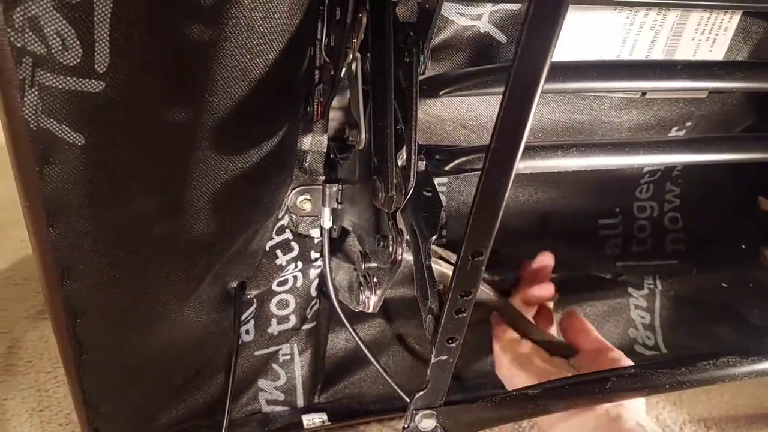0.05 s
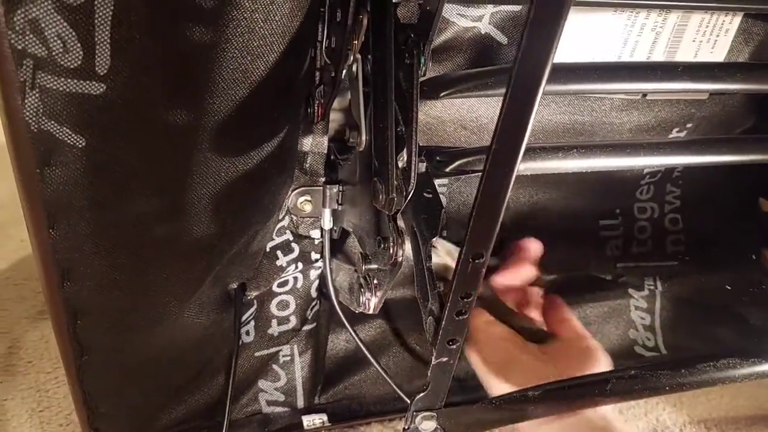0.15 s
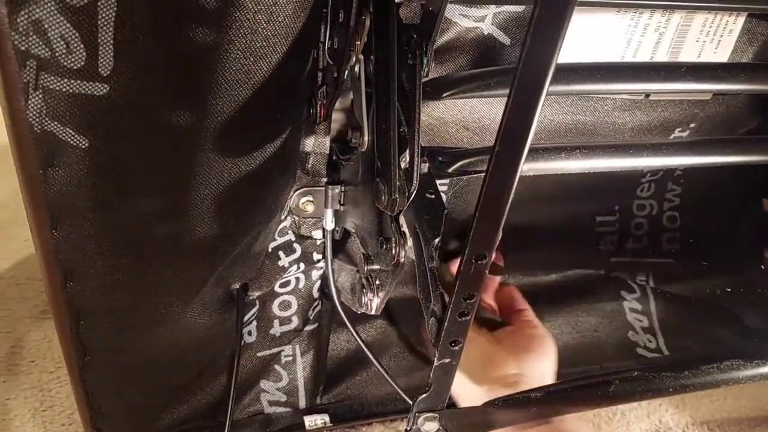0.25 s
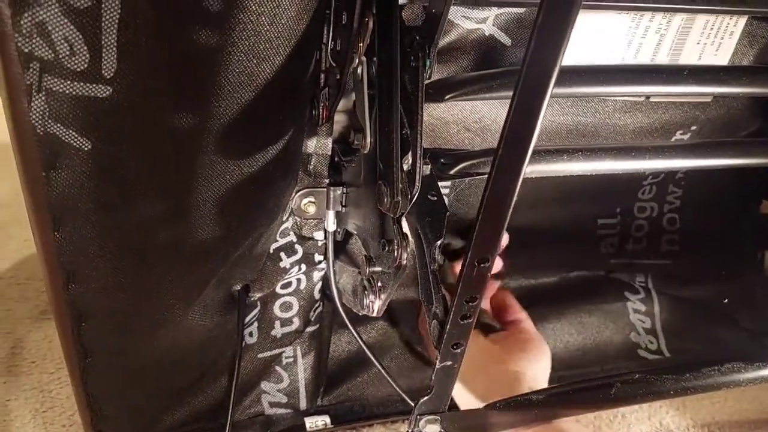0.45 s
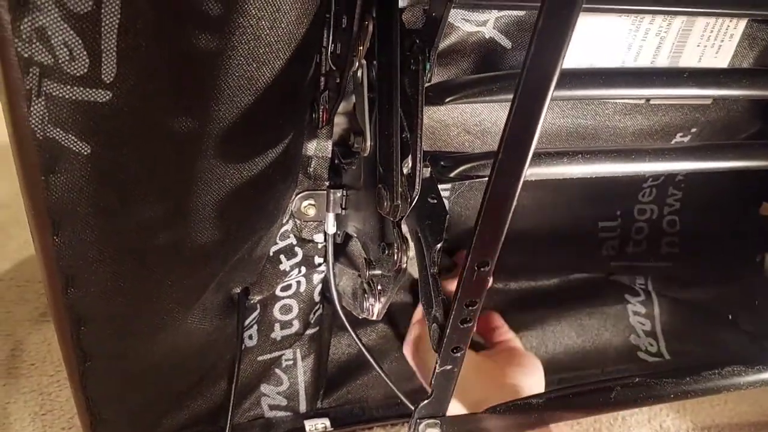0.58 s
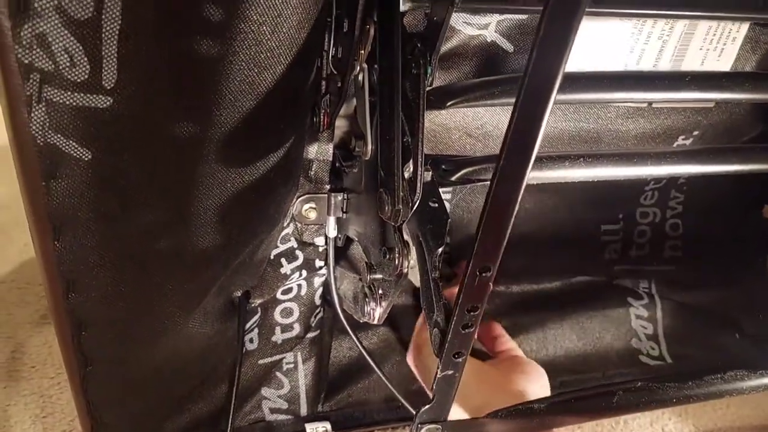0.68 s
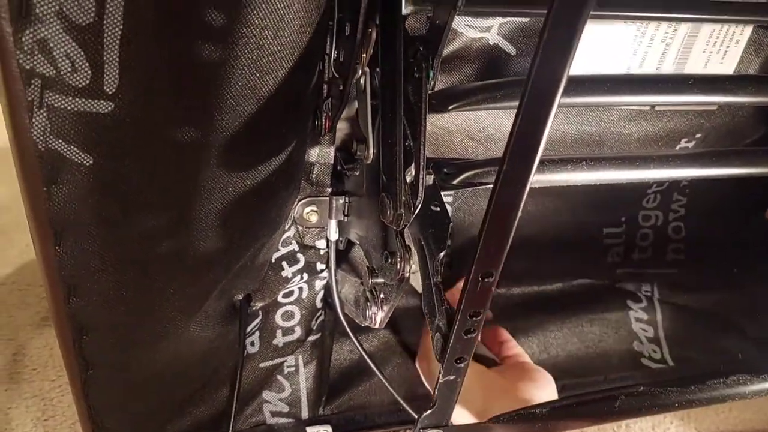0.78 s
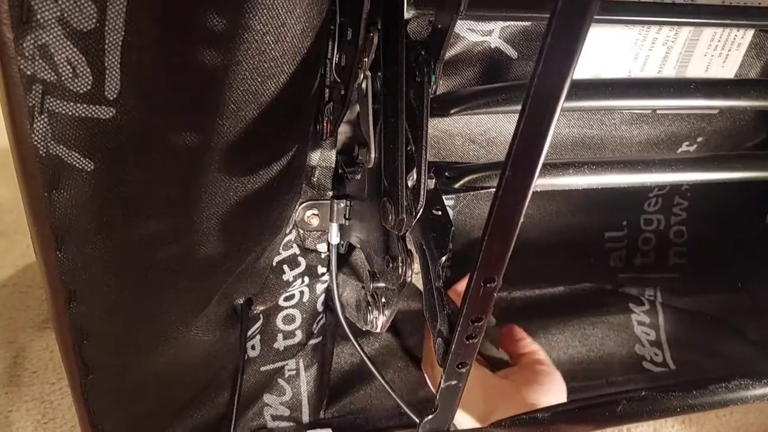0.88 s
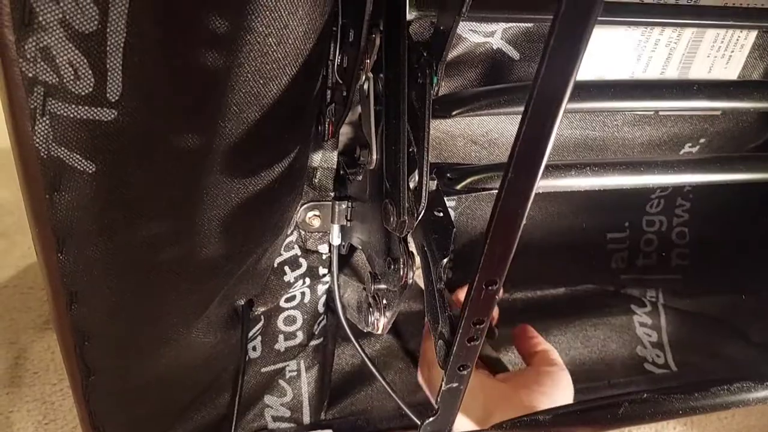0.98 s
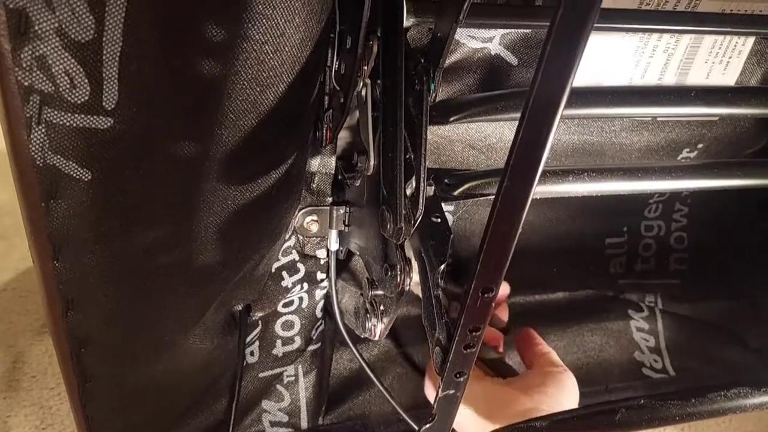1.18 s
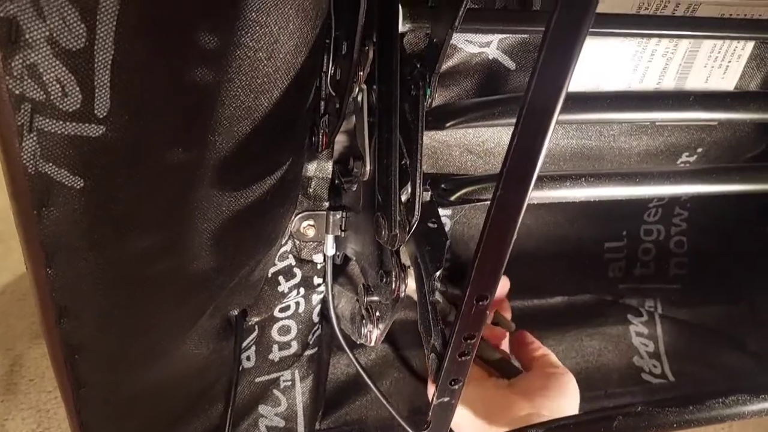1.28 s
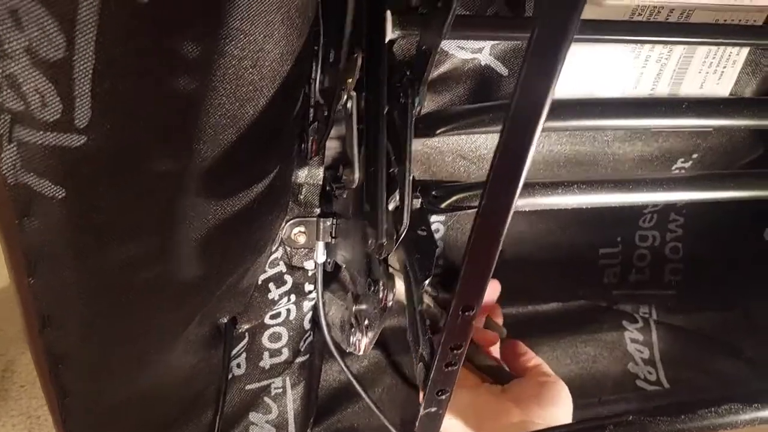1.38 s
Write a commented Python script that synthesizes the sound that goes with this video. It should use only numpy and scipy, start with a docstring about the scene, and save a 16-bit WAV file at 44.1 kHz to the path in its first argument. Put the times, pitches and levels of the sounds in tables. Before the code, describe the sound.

A loose metal part clacks against a recliner's steel linkage: one sharp knock, a double clack, a faint tick, then a softer knock. The chair frame thuds dully and cloth rubs quietly between them, close by in a room.

```python
"""In a carpeted room, a hand works a loose metal part into the steel linkage under a tipped-up recliner.
Each contact is an impact that excites two bodies: the steel gives a bright clack and rings, and the
upholstered frame bolted to it gives a dull thud. The heavy chair sways with a low boom, and the room
adds a short reverberation. Between contacts, arm and cloth slide softly over the chair's lining."""
import sys
import numpy as np
from scipy import signal
from scipy.fft import rfft, irfft
from scipy.io import wavfile

SR = 44100
rng = np.random.default_rng(int(sys.argv[2]) if len(sys.argv) > 2 else 0)


def to_wav(sig):
    """Store sig (one row per channel, or 1-D mono) as 16-bit WAV at the path in sys.argv[1].

    Samples outside -1..1 are clipped; the rate is SR.
    """
    pcm = np.clip(np.atleast_2d(sig), -1, 1) * 32767
    pcm = np.round(pcm).astype(np.int16)
    wavfile.write(sys.argv[1], SR, pcm.T)  # frames by channels


N = 63945
TIME = np.arange(N) / SR
ATTACK_S = 0.00039  # rise time of steel on steel

# Impacts of the part on the linkage: start_s, clack_db, tick_db, ring_db, knock_db, thump_db, rattle_s,
# favoured_hz, boost_db, decay_factor (small when the hand damps the steel), sway_db
CONTACTS = [(.225, -23.5, -23, -29, -17.5, -21.5, 0.0037, 4600, 7.7, 1.135, -29),
            (.553, -34.5, -31.5, -52, -58, -33.5, 0.0016, 4300, 2.9, 0.85, -47),
            (0.578, -25, -25, -33, -28.5, -29, 0.0037, 3350, 6.2, 0.69, -35),
            (.9485, -51.5, -29, -60.5, -55, -40, 0.0009, 3300, 17, 0.47, -65),
            (1.1702, -34.5, -33, -43.5, -34.5, -36, 0.0031, 1350, 15.4, 1.25, -40.5)]


def from_db(db):
    """Amplitude grows tenfold for every 20 dB."""
    return 10 ** (np.asarray(db) / 20)


def place(x, pan_db, lag_s=0):
    """Direction is heard from differences in level (pan_db, left minus right) and time (left lags)."""
    left, right = x * np.ones((2, 1))
    return np.array([np.interp(TIME - lag_s, TIME, left) * from_db(pan_db / 2),
                     right * from_db(-pan_db / 2)])


def noise(spectrum, coherence):
    """Spectral shaping of stereo noise to unit rms; coherence is the correlation of the channels."""
    hz, db = np.transpose(spectrum)
    bins_hz = np.fft.rfftfreq(N, 1 / SR)
    gain = from_db(np.interp(np.log(bins_hz + 1), np.log(hz), db))
    gain *= np.minimum(bins_hz / hz[0], 1) ** 2
    mid, side = irfft(rfft(rng.standard_normal((2, N))) * gain, N)
    x = np.sqrt(1 + coherence) * mid + np.sqrt(1 - coherence) * np.array([side, -side])
    return x / x.std()


def burst(start_s, attack_s, hold_s, t60_s):
    """Damping: an envelope rises linearly and, from hold_s on, falls 60 dB in each t60_s."""
    age = TIME - start_s
    return np.clip(age / attack_s, 0, 1) * np.exp(-np.log(1000) * np.maximum(age - hold_s, 0) / t60_s)


def ring(start_s, hz, t60_s, push_s):
    """A damped oscillator builds up while it is pushed, then decays freely."""
    return burst(start_s, push_s, push_s, t60_s) * np.sin(2 * np.pi * hz * (TIME - start_s))


def sliding_cloth(grain_db=1.5, grain_s=0.009):
    """Sliding friction makes broadband noise: a grainy rub and hiss over the handled chair's rumble."""
    # Course of the sliding: time_s, rub_db, hiss_db, rumble_db
    slide = [(0, -56.5, -64.5, -63.5), (.06, -57, -61, -67), (.135, -54.5, -48.5, -73.5),
             (.165, -54, -54.5, -64), (0.199, -55, -40.5, -54), (.3, -50.5, -50, -40.5),
             (.42, -60, -57, -52.5), (.54, -64, -56, -58), (.68, -63, -68, -53.5), (.75, -59, -63, -59.5),
             (.8, -57.5, -61, -57), (0.913, -56, -67, -51), (0.951, -48.5, -48, -58.5),
             (1.01, -56, -67.5, -57), (1.12, -61.5, -65.5, -64.5), (1.221, -54.5, -59, -47),
             (1.279, -67.5, -82.5, -53.5), (1.37, -77.5, -71.5, -61.5), (1.45, -63, -60.5, -65.5)]
    # Spectra of the three noises: frequency_hz, density_db
    rub_spectrum = [(300, 7.5), (500, -1.5), (800, 0), (1300, -4), (2200, 4.5), (2800, 0.5), (3350, -6.5),
                    (4300, 0), (5500, -3.5), (6900, -1), (8500, -17.5), (12000, -29), (16000, -4)]
    hiss_spectrum = [(4500, -5), (9000, -11), (11000, -1.5), (12500, 6.5), (14500, 1.5), (16000, 3)]
    rumble_spectrum = [(20, -28), (45, 2), (65, 2), (115, 9.5), (180, -4), (250, -4), (370, 0), (550, -10),
                       (900, -53.5), (2000, -46)]
    times_s, *levels_db = np.transpose(slide)
    rub_gain, hiss_gain, rumble_gain = [from_db(np.interp(TIME, times_s, db)) for db in levels_db]
    fibres = np.interp(TIME / grain_s, np.arange(N), rng.standard_normal(N))
    rub = place(rub_gain * noise(rub_spectrum, coherence=0.04), pan_db=3)
    hiss = place(hiss_gain * noise(hiss_spectrum, coherence=0.035), pan_db=-5.5)
    rumble = place(rumble_gain * noise(rumble_spectrum, coherence=0.87), pan_db=4.5)
    return (rub + hiss) * from_db(grain_db * fibres) + rumble


def rub_resonances(fade_s=0.025):
    """Resonance picks hollow bands out of the friction noise while each stroke lasts."""
    # Rubbed resonances: start_s, end_s, centre_hz, width_hz, level_db, pan_db
    resonances = [(0, 0.223, 1940, 200, -64.5, 4), (0.056, 0.263, 536, 260, -55.5, -1.5),
                  (0.077, 0.187, 11360, 700, -62.5, -18), (0, 0.437, 12600, 400, -76.5, -13),
                  (0.242, 0.505, 4980, 500, -62, 0), (0.26, 0.502, 6570, 550, -61, 4.5),
                  (0.737, 1.18, 1940, 283, -69, 5), (0.74, 1.174, 2770, 232, -77, -20),
                  (0.753, 1.173, 4070, 378, -69, 3), (0.77, 1.187, 4710, 324.1, -69.5, 4),
                  (1.163, 1.262, 5830, 300, -67, 14)]
    out = np.zeros((2, N))
    for start_s, end_s, hz, width_hz, db, pan_db in resonances:
        bandpass = signal.butter(2, [hz - width_hz / 2, hz + width_hz / 2], "band", fs=SR, output="sos")
        band = signal.sosfilt(bandpass, rng.standard_normal((2, N)))
        stroke = np.clip(np.minimum(TIME - start_s, end_s - TIME) / fade_s, 0, 1)
        out += place(from_db(db) * stroke * band / band.std(), pan_db)
    return out


def favoured_db(hz, centre_hz, boost_db, width_octaves=0.22):
    """The point of impact sets which modes are excited best: a bell-shaped boost in frequency."""
    return boost_db * np.exp(-0.5 * (np.log2(hz / centre_hz) / width_octaves) ** 2)


def impact(start_s, rattle_s, t60_s, bite_db=-10):
    """An impact's envelope holds while the part rattles, then decays; a sharp bite marks its onset."""
    bite = from_db(bite_db) * burst(start_s + 0.0012, ATTACK_S, ATTACK_S, t60_s=0.0074)
    return burst(start_s, ATTACK_S, rattle_s, t60_s) + bite


def steel_linkage(scatter_db=3.5, clack_t60_s=0.037, tick_t60_s=0.04, coherence=0.18, lag_s=0.00042):
    """Impact excitation: the steel's crowded modes merge into a noisy clack; the strongest ring on."""
    # Light touches of the steel: start_s, level_db
    touches = [(0.272, -36), (.602, -69), (1.149, -55.5), (1.327, -68), (1.338, -69), (1.427, -67)]
    # Modes of the links: pitch_hz, level_db, t60_s, pan_db
    link_modes = [(746.4, -10.5, 0.27, 5), (1114, -12.5, 0.18, 9.5), (1410, -6.5, .13, 6),
                  (1690, -3.5, 0.08, -3), (1839, -3, 0.069, 10.5), (2055, -10.5, 0.056, 13),
                  (2327, -6.5, 0.072, 9.5), (2393, 2, 0.083, 11), (2725, 2.5, 0.031, 1.5),
                  (3395, -7, 0.11, -5.5), (3726, -8, .06, -9), (3680, -2.5, .07, -9.5),
                  (4826, -9, 0.048, 6.5), (5050, -20, 0.02, 14.5), (5825, -1, 0.042, 18),
                  (7710, -3.5, 0.024, 9)]
    # Spectra of the clack and of its high tick: frequency_hz, density_db
    clack_spectrum = [(200, 5), (500, -1.5), (900, -11), (1400, -11.5), (2200, 3.5), (3000, -3),
                      (4300, -1.5), (6000, 1), (7700, -1.5), (8700, -11.5), (11000, -8), (16000, -11)]
    tick_spectrum = [(6000, -14), (8700, -10.5), (9800, -14.5), (11200, 1.5), (12500, 5), (13400, 6.5),
                     (15000, -7.5), (16000, -3)]
    # The loose part's own mode: pitch_hz, level_db (relative to the tick), t60_s
    part_mode = (11000, -8.5, 0.058)
    part_hz, part_db, part_t60_s = part_mode
    clack_hz, density_db = np.transpose(clack_spectrum)
    grid_hz = np.geomspace(clack_hz[0], SR / 2, 200)
    grid_db = np.interp(np.log(grid_hz), np.log(clack_hz), density_db)
    touching = sum(from_db(db) * burst(start_s, ATTACK_S, ATTACK_S, clack_t60_s)
                   for start_s, db in touches)
    clack = touching * noise(clack_spectrum, coherence)
    treble = noise(tick_spectrum, coherence)
    tick, modes = np.zeros((2, N)), np.zeros((len(link_modes), N))
    for start_s, clack_db, tick_db, ring_db, _, _, rattle_s, centre_hz, boost_db, decay, _ in CONTACTS:
        spectrum = np.transpose([grid_hz, grid_db + favoured_db(grid_hz, centre_hz, boost_db)])
        clack += from_db(clack_db) * impact(start_s, rattle_s, clack_t60_s) * noise(spectrum, coherence)
        part_ring = from_db(part_db) * ring(start_s, part_hz, part_t60_s * decay, ATTACK_S)
        tick += from_db(tick_db) * (impact(start_s, rattle_s, tick_t60_s * decay) * treble + part_ring)
        for k, (hz, db, t60_s, _) in enumerate(link_modes):
            strength_db = ring_db + db + favoured_db(hz, centre_hz, boost_db) + scatter_db * rng.normal()
            modes[k] += from_db(strength_db) * ring(start_s, hz, t60_s * decay, ATTACK_S)
    rings = sum(place(mode, pan_db, lag_s) for mode, (*_, pan_db) in zip(modes, link_modes))
    return place(clack, pan_db=6.5, lag_s=lag_s) + place(tick, pan_db=-4, lag_s=lag_s) + rings


def frame_blows():
    """Contacts pass through the bolts and join the frame's own bumps: start_s, knock_db, thump_db."""
    # Soft bumps as the frame settles: start_s, knock_db, thump_db
    bumps = [(.272, -40, -33.5), (1.328, -54.5, -50), (1.367, -67, -69.5)]
    return [(start_s, knock_db, thump_db) for start_s, _, _, _, knock_db, thump_db, *_ in CONTACTS] + bumps


def chair_frame(thump_below_hz=250, push_cycles=3.3):
    """Modal superposition: the frame's upper modes knock at once; its heavy low ones swell to a thump."""
    # Modes of the frame: pitch_hz, level_db, t60_s
    frame_modes = [(122.8, -9.5, 0.21), (140.7, 3.5, 0.13), (203.1, -5, 0.083), (293, -23.5, .22),
                   (363.8, 4, 0.068), (376.3, -7.5, 0.2), (434, -8.5, 0.15), (496, -13.5, 0.3),
                   (548, -13.5, 0.15), (579, -15, 0.23), (615, -33.5, 0.15)]
    out = np.zeros(N)
    for start_s, knock_db, thump_db in frame_blows():
        for hz, db, t60_s in frame_modes:
            if hz < thump_below_hz:
                out += from_db(thump_db + db) * ring(start_s + 0.00062, hz, t60_s, push_cycles / hz)
            else:
                out += from_db(knock_db + db) * ring(start_s + 0.00033, hz, t60_s, push_s=0.0047)
    return place(out, pan_db=1, lag_s=0.00025)


def room_reverberation(steel_rise_s=0.0075, steel_t60_s=0.21, frame_rise_s=0.015, frame_t60_s=0.3):
    """In a diffuse field energies add: short bright tails for the steel, longer dull ones for the frame."""
    # Spectra of the two tails: frequency_hz, density_db
    steel_spectrum = [(500, -8), (900, 1.5), (1500, 0.5), (2400, -2), (3500, -7), (6000, -5.5), (9000, -24),
                      (12500, -8.5), (16000, -13)]
    frame_spectrum = [(35, -35.5), (50, -19), (70, 3.5), (125, -1), (180, -6), (250, -6), (360, -2.5),
                      (550, -15.5), (800, -24.5), (2000, -49.5)]
    steel_energy = sum((from_db(db) * decay * burst(start_s, steel_rise_s, steel_rise_s, steel_t60_s)) ** 2
                       for start_s, db, *_, decay, _ in CONTACTS)
    frame_energy = sum((from_db(db) * burst(start_s, frame_rise_s, frame_rise_s, frame_t60_s)) ** 2
                       for start_s, _, db in frame_blows())
    bright = from_db(-11) * np.sqrt(steel_energy) * noise(steel_spectrum, coherence=0.033)
    dull = from_db(-4.5) * np.sqrt(frame_energy) * noise(frame_spectrum, coherence=0.86)
    return place(bright, pan_db=1.5) + dull


def chair_sway(delay_s=0.02, push_s=0.025):
    """Inertia: the heavy chair answers each contact late, with a low boom."""
    # Lowest modes of the whole chair: pitch_hz, level_db, t60_s
    sway_modes = [(72.6, -2, .2), (81.6, -12, 0.11), (114.7, -2, 0.11)]
    return sum(from_db(sway_db + db) * ring(start_s + delay_s, hz, t60_s, push_s)
               for start_s, *_, sway_db in CONTACTS for hz, db, t60_s in sway_modes)


def scene():
    """Superposition: the pressures of the impacts, their reverberation and the friction add."""
    impacts = steel_linkage() + chair_frame() + chair_sway()
    return impacts + room_reverberation() + sliding_cloth() + rub_resonances()


def record(dry):
    """A steep low-pass filter removes the treble above 15750 Hz."""
    return signal.sosfilt(signal.ellip(10, 0.2, 80, 15750, fs=SR, output="sos"), dry)


dry = scene()
out = record(dry)
to_wav(out)
```